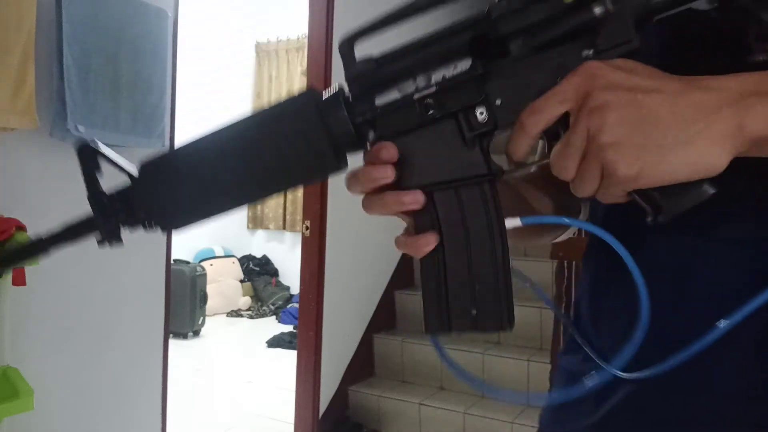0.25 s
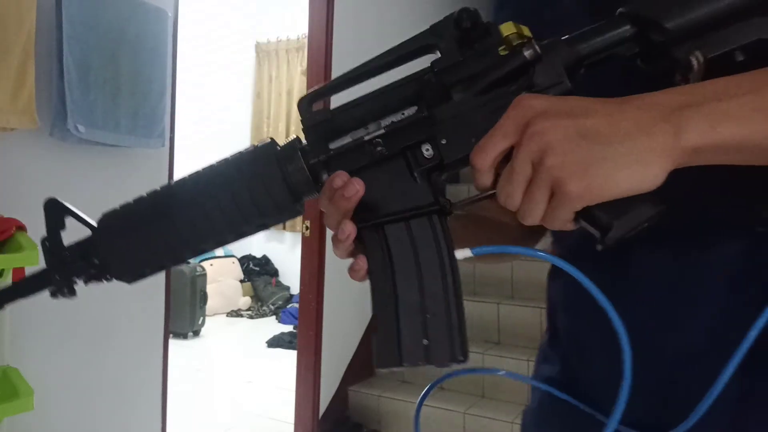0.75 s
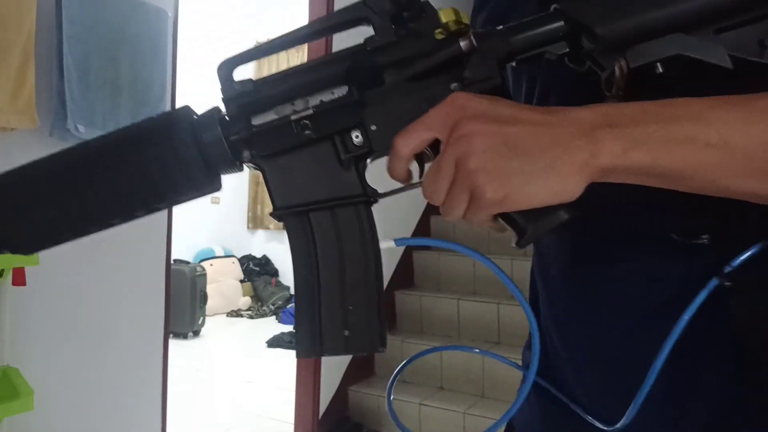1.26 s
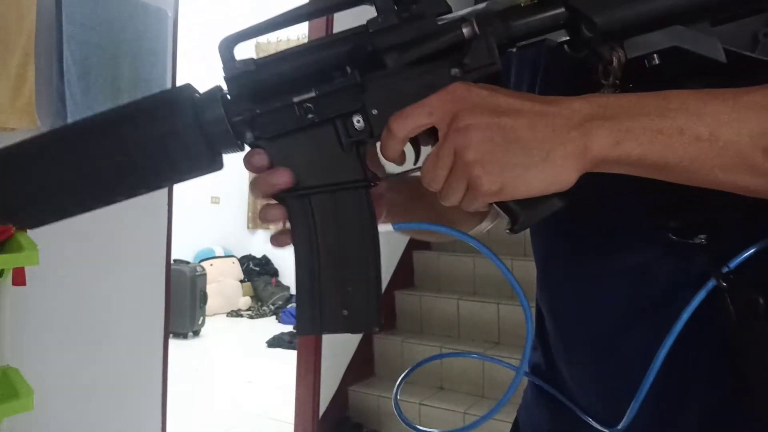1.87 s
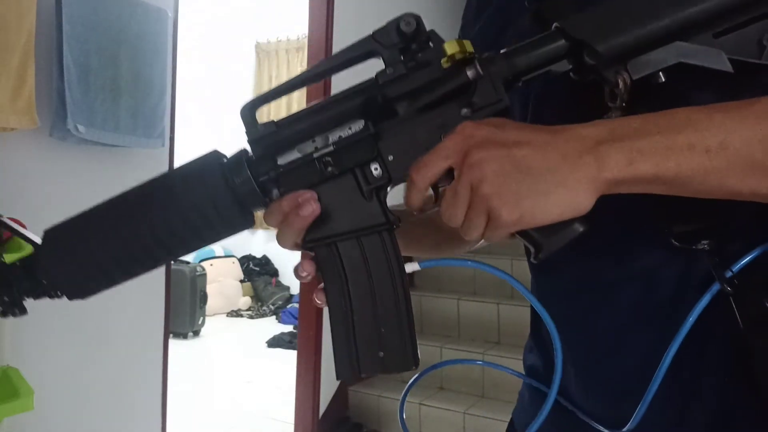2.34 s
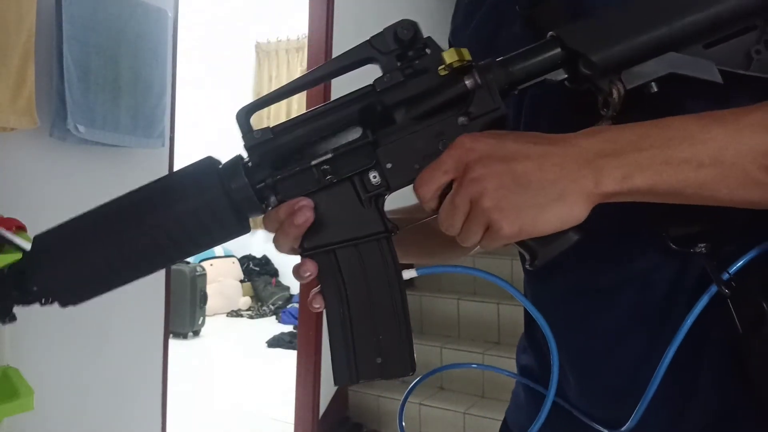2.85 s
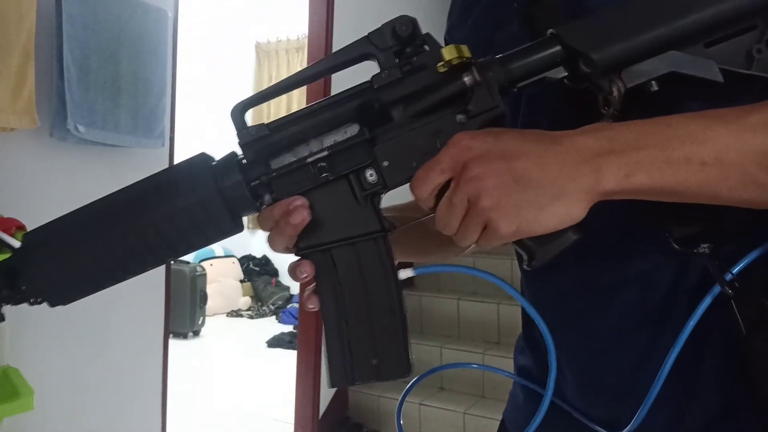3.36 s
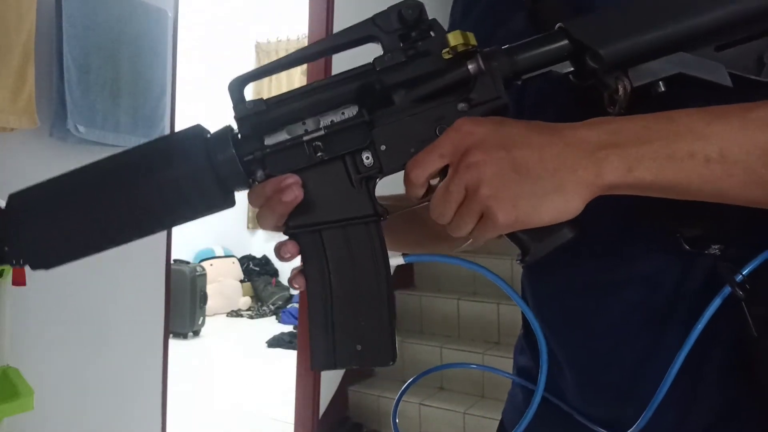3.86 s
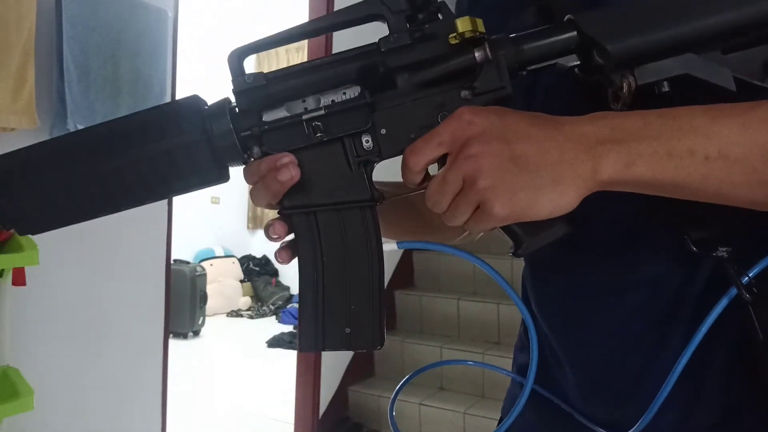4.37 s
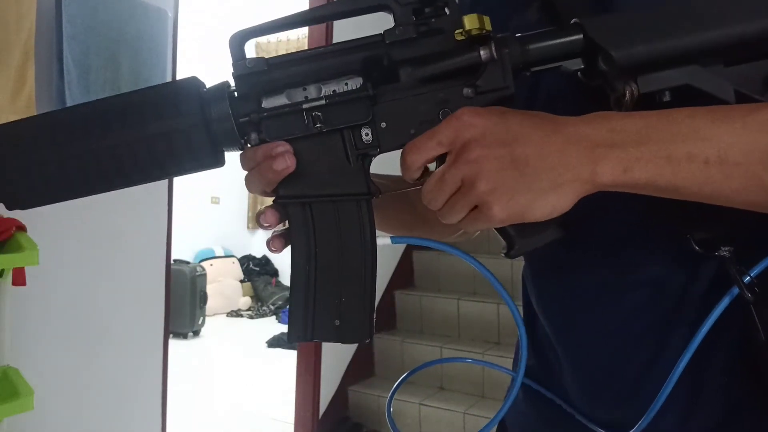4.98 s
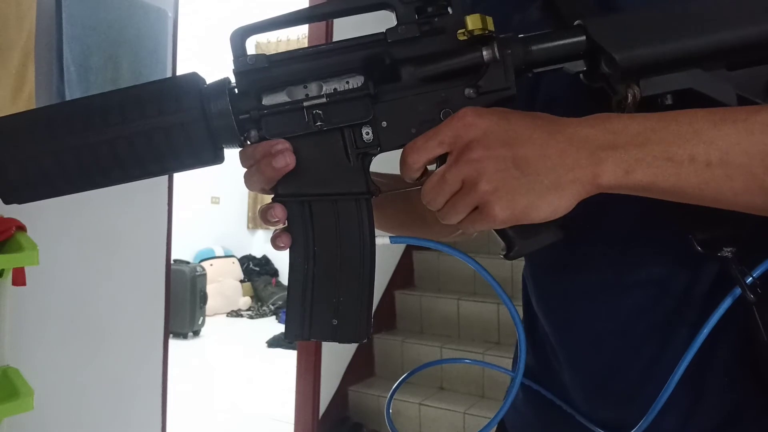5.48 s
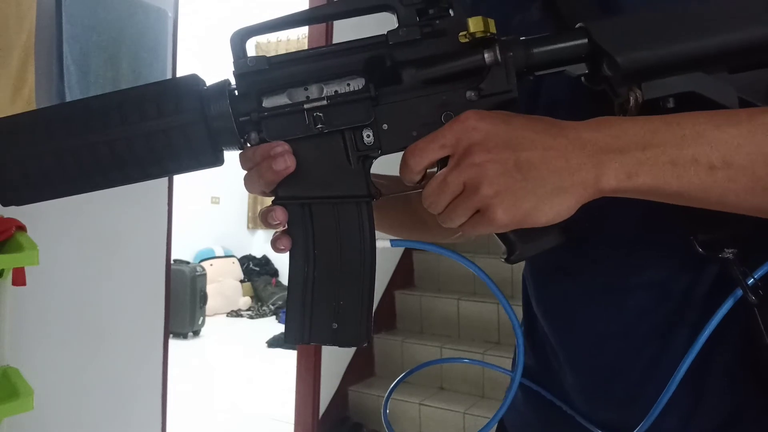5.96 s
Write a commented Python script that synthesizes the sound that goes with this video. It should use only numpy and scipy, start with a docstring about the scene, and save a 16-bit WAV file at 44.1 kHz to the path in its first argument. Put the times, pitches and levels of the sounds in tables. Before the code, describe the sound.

Magazine clicks into an air-powered toy rifle, the bolt snaps shut, then six sharp, evenly spaced shots crack and ring in a hard stairwell.

```python
"""An air-fed blowback toy rifle is readied and fired six times in a hard-walled stairwell, close to a phone.
Each shot is a valve snap, a muzzle blast of shaped noise that excites the room modes, and the bolt rattling back
to its stop and slamming home; impacts are noise clicks that drive the damped modes of a hollow receiver.
First the magazine is seated over its catch and the bolt let go. An appliance hums throughout as wavering sines.
Decaying noise gives the reverberation, and a limiter squeezes the shots."""
import sys
import numpy as np
from scipy import signal
from scipy.fft import rfft, irfft
from scipy.io import wavfile
from scipy.ndimage import uniform_filter1d, minimum_filter1d

SR = 44100
rng = np.random.default_rng(int(sys.argv[2]) if len(sys.argv) > 2 else 0)


def store_wav(level_fs):
    """Save 16-bit WAV to argv[1]."""
    pcm = np.round(np.clip(np.atleast_2d(level_fs), -1, 1) * 32767)
    wavfile.write(sys.argv[1], SR, pcm.T.astype(np.int16))


N = 274302


def amp(db):
    """Decibel law: a level becomes an amplitude factor."""
    return 10 ** (np.asarray(db) / 20)


def evened(x):
    """Power normalisation: scales a signal to rms 1."""
    return x / np.sqrt(np.mean(x ** 2) + 1e-20)


def read(points, hz):
    """Logarithmic frequency scale: interpolates a table along it."""
    f, value = np.transpose(points)
    return np.interp(np.log(hz + 1), np.log(f + 1), value)


def add(mix, s, sound):
    """Superposition: lays a sound into the stereo mix at time s."""
    part = mix[:, max(round(s * SR), 0):][:, :sound.shape[-1]]
    part += sound[..., :part.shape[1]]


# likeness of the two channels in a diffuse field: (frequency [Hz], correlation [0-1])
CHANNEL_LIKENESS = [(60, 0.92), (290, 0.51), (640, 0.45), (1400, 0), (16000, 0.15)]


def diffuse(spectrum, size):
    """Diffuse-field coherence: stereo noise of rms 1, alike in the bass and mostly unrelated in the treble."""
    hz = np.fft.rfftfreq(size, 1 / SR)
    left, other = rfft(rng.standard_normal((2, size)))
    alike = np.clip(read(CHANNEL_LIKENESS, hz), -1, 1)
    right = alike * left + np.sqrt(1 - alike ** 2) * other
    return evened(irfft(np.array([left, right]) * amp(read(spectrum, hz)), size))


def gritty(size, grain_db, smoothing):
    """Amplitude modulation: a random gain from smoothed noise (smoothing in samples)."""
    return amp(grain_db * evened(uniform_filter1d(rng.standard_normal(size), size=smoothing)))


def burst(spectrum, decay, rise=0.00023, grain_db=2):
    """Transient noise: a gritty, coloured puff with a quick rise and an exponential fall (time constants, s)."""
    t = np.arange(4096) / SR
    grit = gritty(len(t), grain_db, smoothing=40)
    noise = evened(grit * diffuse(spectrum, size=len(t)))
    return noise * (1 - np.exp(-t / rise)) * np.exp(-t / decay)


def ring(modes, t):
    """Modal superposition: damped sines struck at t = 0."""
    return sum(amp(db - 60 * t / t60) * np.sin(2 * np.pi * hz * t) for hz, db, t60 in modes)


def push(t, hz, decay):
    """Heavily damped oscillation: a pressure pulse that soon dies."""
    return t / decay * np.exp(1 - t / decay) * np.sin(2 * np.pi * hz * t)


# the receiver's ring before any pitch scaling: (frequency [Hz], relative level [dB], t60 [s])
RECEIVER_MODES = [(692, -2, 0.017), (880, 6.5, 0.016), (1044, 6.5, 0.028), (1090, -8.5, 0.029),
                  (1426, -15.5, 0.019), (1860, 0.5, 0.0056), (2330, -31, 0.0009)]
# relative spectrum of a click: (frequency [Hz], level per Hz [dB])
CLICK_SPECTRUM = [(100, -9), (500, -16.5), (1500, -1), (3000, -4), (4500, 3.5), (7000, 3.5), (12000, -5.5),
                  (16000, -1)]


def strike(bright_db, hollow_db, decay, pitch=1, contact=0.0026, shared=0.42, spectrum=CLICK_SPECTRUM):
    """Impact excitation: one contact gives a bright click and shakes the hollow receiver."""
    click = burst(spectrum, decay)
    t = np.arange(click.shape[1]) / SR
    force = rng.standard_normal(click.shape) * np.exp(-t / contact)
    force = force + shared * force[::-1]  # each channel takes some of the other
    response = np.diff(ring(RECEIVER_MODES, t * pitch))[None]
    body = signal.fftconvolve(force, response, axes=1)[:, :len(t)]
    body /= np.sqrt(np.mean(body[:, :SR // 200] ** 2, axis=1, keepdims=True))  # rms 1 over the first 5 ms
    return amp(bright_db) * click + amp(hollow_db) * body


# thinner, brighter relative spectrum of parts that scrape: (frequency [Hz], level per Hz [dB])
RASP_SPECTRUM = [(100, -7.5), (500, -8.5), (1500, -2.5), (3000, -1), (4500, 4.5), (7000, 4.5), (12000, 0),
                 (16000, -5.5)]


def slide(length, release, hollow_db, rise=.004, grain_db=0.5):
    """Friction noise: rubbing metal gives a gritty hiss that holds, then dies, and stirs the receiver."""
    t = np.arange(SR // 2) / SR
    grit = gritty(len(t), grain_db, smoothing=90)
    hiss = diffuse(RASP_SPECTRUM, size=len(t))
    response = np.diff(ring(RECEIVER_MODES, t))[None]
    body = evened(signal.fftconvolve(hiss, response, axes=1)[:, :len(t)])
    envelope = (1 - np.exp(-t / rise)) * np.exp(-np.maximum(t - length, 0) / release)
    return (hiss + amp(hollow_db) * body) * evened(grit) * envelope


def drift(rate_hz):
    """Band-limited fluctuation: a slow random wander of rms 1 through about rate_hz knots a second."""
    t = np.arange(N) / SR
    knots = rng.standard_normal(int(t[-1] * rate_hz) + 4)
    return evened(signal.resample(knots, N))


# steady hum: (frequency [Hz], middle rms level [dB], largest waver either way [dB])
HUM_TONES = [(71, -59, 5), (119.3, -49, 7), (188.2, -47, 5.5), (216.6, -55.5, 2.5), (306, -57, 9),
             (357.3, -60, 10.5), (467, -54.5, 2)]
# relative spectrum of the room air: (frequency [Hz], level per Hz [dB])
AIR_SPECTRUM = [(25, -26), (48, -11), (65, -28), (100, -0.5), (160, -0.5), (250, -1), (500, -0.5),
                (1000, -6), (2000, -7), (3000, -11), (7000, -14.5), (12000, -25), (16000, -16)]


def background(air_db=-40, phase_wander=0.39):
    """Modulated tones over broadband noise: an appliance's gently wavering hum (phase in rad) and room air."""
    t = np.arange(N) / SR
    hum = 0
    for hz, db, waver_db in HUM_TONES:
        level = amp(db + waver_db * np.tanh(drift(5.5)))
        phase = phase_wander * drift(5.4)
        hum += np.sqrt(2) * level * np.sin(2 * np.pi * hz * t + phase)
    return hum + amp(air_db) * diffuse(AIR_SPECTRUM, size=N)


# the magazine passes its catch: (time [s], bright click level [dB], relative hollow body level [dB])
MAGAZINE_NOTCHES = [(1.3978, -4.5, -8.5), (1.4177, 0.5, -1), (1.4385, -7.5, -9), (1.457, -7, -2.5)]


def handling(rub_db=-22, seat_db=-23, body_db=-19, lead=.006, first_pitch=1.39, pitch_step=0.812):
    """Friction and cavity tuning: the raised rifle rubs; the magazine slides in, each notch sounding lower."""
    out = np.zeros((2, N))
    add(out, 0, amp(rub_db) * slide(length=0.036, release=0.038, hollow_db=-16, rise=0.00033))
    first, last = MAGAZINE_NOTCHES[0][0], MAGAZINE_NOTCHES[-1][0]
    seating = slide(length=last - first + lead, release=0.0068, hollow_db=-6.5, rise=0.0028)
    add(out, first - lead, amp(seat_db) * seating)
    for k, (s, click_db, hollow_db) in enumerate(MAGAZINE_NOTCHES):
        pitch = first_pitch * pitch_step ** k
        add(out, s, strike(click_db, body_db + hollow_db, decay=0.0023, pitch=pitch, spectrum=RASP_SPECTRUM))
    return out


# fingers on catch and trigger: (time [s], bright click level [dB], hollow body level [dB], click decay [s])
FINGER_TICKS = [(0.5976, -25.5, -49, 0.0013), (0.784, -25, -55, 0.0011), (0.8748, -17, -52, 0.0012),
                (0.8805, -14, -46, 0.0014), (0.999, -26, -39, .001), (1.002, -29.5, -38, 0.008),
                (1.585, -19.5, -50, 0.0024)]


def ticks():
    """Light impact: fingers make small clicks close to the phone."""
    out = np.zeros((2, N))
    for s, bright_db, hollow_db, decay in FINGER_TICKS:
        add(out, s, strike(bright_db, hollow_db, decay, spectrum=RASP_SPECTRUM))
    return out


# dry, heavy knocks: (time [s], swing level [dB])
HEAVY_KNOCKS = [(2.208, 5.5), (2.881, 8.5), (3.4533, 8), (4.0152, 6), (4.589, 2)]


def knocks(edge_db=-14):
    """Heavily damped impact: a stiff, dead blow is one short swing with a gritty edge."""
    out = np.zeros((2, N))
    swing = push(np.arange(SR // 20) / SR, hz=1390, decay=0.00028)
    for s, db in HEAVY_KNOCKS:
        add(out, s, amp(db) * swing)
        add(out, s, amp(db + edge_db) * burst(CLICK_SPECTRUM, decay=0.0049))
    return out


def release(close_db=-3, bounce_delay=0.0044, spring_db=-21):
    """Stored spring energy: the catch clicks, the bolt runs forward and closes with a bounce; its spring rasps."""
    out = np.zeros((2, N))
    pressed = 2.2299  # s
    closed = pressed + .0274
    rasp = RASP_SPECTRUM
    add(out, pressed, strike(bright_db=-1.5, hollow_db=-33, decay=0.0054, spectrum=rasp))
    add(out, closed, strike(close_db + 1.5, close_db - 11, decay=0.0031, pitch=1.36, spectrum=rasp))
    bounce = strike(close_db - 2.5, close_db - 15, decay=0.0032, pitch=0.562, spectrum=rasp)
    add(out, closed + bounce_delay, bounce)
    add(out, closed, amp(spring_db) * slide(length=0.071, release=0.013, hollow_db=-2, rise=0.032))
    return out


# one row a shot, levels relative: (time [s], blast level [dB], room boom level [dB], low thump level [dB],
# bolt's travel to the rear stop [s], cocking click level [dB], rear stop level [dB])
SHOT_EVENTS = [(2.821, 3.5, -10, 6.5, .106, 1, 0.5), (3.383, 0.5, -3.5, -3, 0.1, -4, 0.5),
               (3.945, 2, -3.5, 1, 0.1, -16, -2), (4.512, 0.5, -4, -5, 0.084, -1, -5.5),
               (5.0406, -1, -4.5, -8, .099, -2.5, -2), (5.614, 1, -4.5, -5, 0.1, -3, -2)]
# hammer, valve and nozzle within every shot: (delay [s], relative level [dB])
VALVE_SNAPS = [(0.0003, -7.5), (0.002, 3), (0.0058, 3)]
# relative spectrum of the muzzle blast: (frequency [Hz], level per Hz [dB])
BLAST_SPECTRUM = [(40, -21), (120, -1), (240, 12.5), (400, -1.5), (650, 17), (900, -1), (1500, 1),
                  (2800, 2.5), (4500, 4), (7000, 7.5), (12000, -4), (16000, 3.5)]
# room modes that the blast excites: (frequency [Hz], relative level [dB], t60 [s])
STAIRWELL_MODES = [(66.8, -40, 2.2), (115.3, -44.5, 4.1), (174.33, -10.5, 1.13), (187.6, -24, 0.78),
                   (224.7, -16.5, 0.72), (252, -16, 0.69), (263, -30.5, 1.48), (558, -28, 1.02),
                   (694, -33, 1.1), (641, -28, 1.21)]


def shots(blast_db=4.5, blast_delay=.0095, blast_decay=0.012, snap_db=-1, snap_decay=0.0042, thump_db=-3,
          swing_db=-28, swing_time=0.005, jolt_db=-13, boom_gain_db=5, boom_start=0.32, boom_build=0.1):
    """Sudden gas release: hammer swing, valve snaps and jolt, muzzle air; returns direct sound and modal boom."""
    direct, boom = np.zeros((2, 2, N))
    t = np.arange(2 * SR) / SR
    thump = push(t, hz=266, decay=0.0018)
    build_up = 1 - (1 - boom_start) * np.exp(-(t / boom_build) ** 2)
    modes = amp(boom_gain_db) * ring(STAIRWELL_MODES, t) * build_up
    swell = np.exp(-t[:SR // 20][::-1] / swing_time)  # rises up to the moment of the shot
    for s, db, boom_db, low_db, *_ in SHOT_EVENTS:
        swing = swell * diffuse(CLICK_SPECTRUM, size=len(swell))
        add(direct, s - len(swell) / SR, amp(swing_db) * swing)
        for delay, part_db in VALVE_SNAPS:
            add(direct, s + delay, amp(db + snap_db + part_db) * burst(CLICK_SPECTRUM, snap_decay))
        jolt = strike(db - 9.5, db + jolt_db, decay=0.026, pitch=1.006, contact=0.0097)
        add(direct, s + VALVE_SNAPS[-1][0], jolt)
        add(direct, s + blast_delay, amp(db + blast_db) * burst(BLAST_SPECTRUM, blast_decay, rise=0.0036))
        add(boom, s + blast_delay, amp(thump_db + low_db) * thump + amp(boom_db) * modes)
    return direct, boom


def recoil(travel_db=-22, cock_lead=0.014, cock_gain_db=2, stop_click_db=-1, stop_body_db=-9,
           rattle_db=-9, rattle_spread_db=3, count=3):
    """Blowback: each shot drives the bolt to rub and rattle in its track, cock the hammer and hit the rear stop."""
    out = np.zeros((2, N))
    for s, _, _, _, travel, cock_db, stop_db in SHOT_EVENTS:
        rub = slide(length=1.54 * travel, release=0.027, hollow_db=-6.5, rise=0.073, grain_db=4.5)
        add(out, s, amp(travel_db) * rub)
        for k, (place, force) in enumerate(rng.random((count, 2))):
            db = rattle_db + rattle_spread_db * (2 * force - 1)
            rattle_time = s + .75 * travel * (k + 1 + place) / (count + 1)
            add(out, rattle_time, strike(db, db - 13, decay=0.00081, pitch=0.91))
        cock = strike(cock_db + cock_gain_db, cock_db - 23.5, decay=0.0051, pitch=0.63)
        add(out, s + travel - cock_lead, cock)
        stop = strike(stop_db + stop_click_db, stop_db + stop_body_db, decay=0.0034, pitch=0.898)
        add(out, s + travel, stop)
    return out


# the bolt slams home and bounces once: (time [s], relative level [dB], bounce level against the slam [dB])
BOLT_SLAMS = [(2.948, -7, 0), (3.515, -3, 2), (4.088, 1, -2), (4.6535, -1, -1), (5.2095, 0, 0),
              (5.812, 1, -1)]


def slams(click_db=-5, body_db=-10, decay=0.0024, bounce_delay=.0075, bounce_click_db=-4, chatter=0.0044,
          pitch=1.08, bounce_pitch=.95, settle_db=-19):
    """Repeated impact: the spring throws the bolt home with a hollow clack; it bounces lower and chatters to rest."""
    out = np.zeros((2, N))
    for s, db, bounce_db in BOLT_SLAMS:
        add(out, s, strike(db + click_db, db + body_db, decay, pitch, contact=chatter))
        again_db = db + bounce_db
        bounce = strike(again_db + bounce_click_db, again_db + body_db, decay, bounce_pitch, contact=chatter)
        add(out, s + bounce_delay, bounce)
        settling = slide(length=0.011, release=0.014, hollow_db=-1, rise=.003, grain_db=3.5)
        add(out, s, amp(db + settle_db) * settling)
    return out


# reverberation: (frequency [Hz], t60 [s])
ROOM_DECAY = [(100, 0.47), (260, 1.2), (700, 0.71), (1800, 0.8), (4800, 0.71), (8000, 0.55), (14000, 0.4)]


def reflections(gap=0.00047, build=0.00036):
    """Exponential reverberant decay: dense reflections from tile and plaster, the low mids lasting longest."""
    noise = diffuse([(50, 0), (16000, 0)], size=3 * SR // 2)
    hz, t, z = signal.stft(noise, SR, nperseg=256)
    decay = amp(-60 * t / read(ROOM_DECAY, hz)[:, None])
    tail = signal.istft(z * decay, SR, nperseg=256)[1]
    since_gap = np.maximum(np.arange(tail.shape[1]) / SR - gap, 0)
    tail *= 1 - np.exp(-since_gap / build)
    return tail / np.linalg.norm(tail[0])


def room(x, count=3, bass_hz=150):
    """Multipath propagation: as the rifle sways its paths change; deep bass is left to the room's modes."""
    sway = np.pi * np.arange(N) / SR / 2
    x = signal.sosfilt(signal.butter(2, bass_hz, "high", fs=SR, output="sos"), x)
    echo = 0
    for k in range(count):
        feed = np.sqrt(2 / count) * np.cos(sway + np.pi * k / count)  # squared feeds sum to 1
        echo = echo + signal.fftconvolve(x * feed, reflections(), axes=1)[:, :N]
    return echo


def ports(x, lag=.00011):
    """Interchannel time difference: direct sound reaches the left microphone first (lag in s)."""
    right = np.pad(x[1], (round(lag * SR), 0))[:N]
    return np.array([x[0], right])


def scene(shot_room_db=0, handling_room_db=-3, release_room_db=-1, recoil_room_db=-3, slam_room_db=-9.0,
          knock_room_db=-13, tick_room_db=-5):
    """Direct and reverberant fields: every rifle sound is heard directly and feeds the room by its own amount."""
    blast, boom = shots()
    sources = [(handling(), handling_room_db), (ticks(), tick_room_db), (knocks(), knock_room_db),
               (release(), release_room_db), (blast, shot_room_db), (recoil(), recoil_room_db),
               (slams(), slam_room_db)]
    echo = room(sum(amp(db) * sound for sound, db in sources))
    direct = ports(sum(sound for sound, db in sources))
    return direct + boom + echo + background()


def limiter(x, ceiling_db=-1.5, recovery_db_per_s=75):
    """Dynamic range compression: peaks pull the gain down promptly; it climbs back while the room rings."""
    over_db = np.maximum(20 * np.log10(abs(x).max(0) + 1e-9) - ceiling_db, 0)
    climb = np.arange(N) / SR * recovery_db_per_s
    gain_db = climb - np.maximum.accumulate(over_db + climb)
    held_db = minimum_filter1d(gain_db, size=31)
    return x * amp(uniform_filter1d(held_db, size=45))


# corner frequencies of the phone's stepped tone colour with its deep treble notch: (frequency [Hz])
PHONE_COLOUR_HZ = [4700, 4850, 6000, 6150, 7650, 7800, 8500, 8900, 11200, 11600, 15600, 16200]
# its gain at those corners: (gain [dB])
PHONE_COLOUR_DB = [-3, -10, -8, 0, 1, -2, -2, -29, -57, -5.5, -6, -49]


def record(dry, low_cut_hz=58, edge_hz=16900):
    """Linear filtering around a limiter: tone colour, limiter, low cut, band limit."""
    hz = np.fft.rfftfreq(2 * N, 1 / SR)
    colour = amp(np.interp(hz, PHONE_COLOUR_HZ, PHONE_COLOUR_DB))
    heard = limiter(irfft(rfft(dry, 2 * N) * colour)[:, :N])
    heard = signal.sosfilt(signal.butter(4, low_cut_hz, "high", fs=SR, output="sos"), heard)
    band_limit = signal.firwin(511, edge_hz, window=("kaiser", 9), fs=SR)
    return signal.oaconvolve(heard, band_limit[None], "same")


dry = scene()
out = record(dry)
store_wav(out)
```